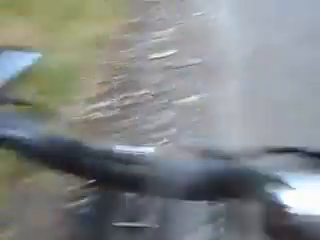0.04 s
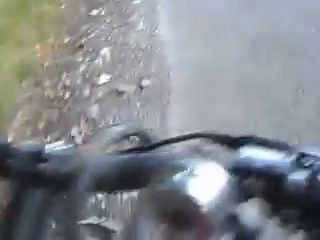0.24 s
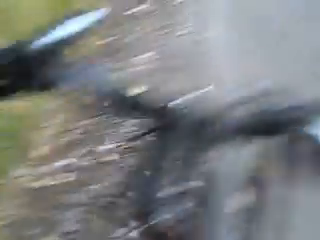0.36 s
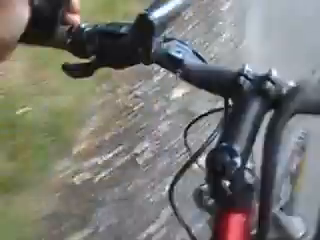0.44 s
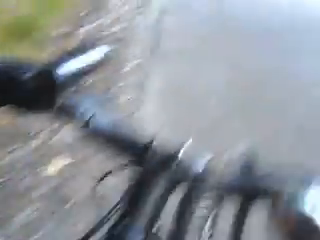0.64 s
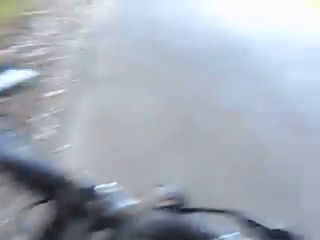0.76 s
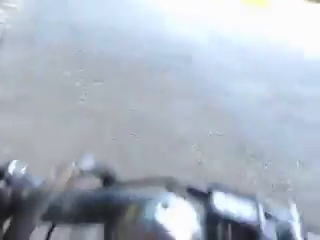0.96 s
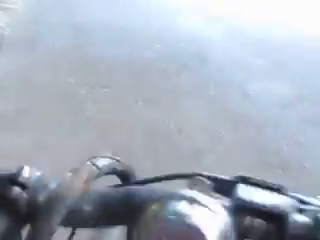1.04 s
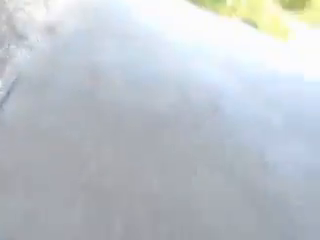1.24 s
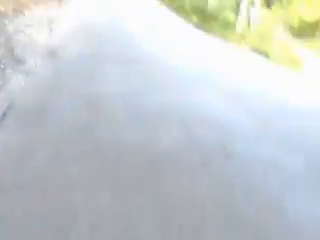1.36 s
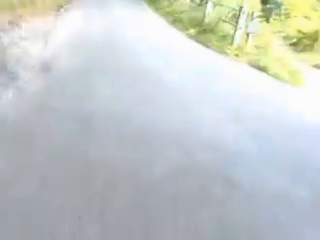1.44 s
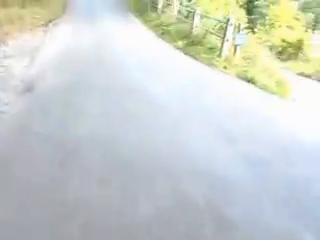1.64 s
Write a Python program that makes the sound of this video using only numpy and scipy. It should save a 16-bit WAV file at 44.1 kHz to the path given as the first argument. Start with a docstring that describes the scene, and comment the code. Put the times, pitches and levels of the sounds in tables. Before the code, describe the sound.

Loud metal clack of a bicycle changing gear, with clicks, rattling chain and faint hiss.

```python
"""A bicycle gives a loud metallic clack, like a gear change, as it rolls along a paved road.
Two sharp clicks lead up to it; then metal parts snap home, bounce and set the frame ringing.
The chain rattles over the sprockets and settles, with a few more clicks along the way.
We listen from a camera just above the handlebar. Its plastic mount knocks now and then
over a faint hiss of tyres and wind."""
import sys
import numpy as np
from scipy import signal
from scipy.fft import rfft, irfft
from scipy.io import wavfile
from scipy.ndimage import uniform_filter1d

SR = 44100
rng = np.random.default_rng(int(sys.argv[2]) if len(sys.argv) > 2 else 0)


def generate_wav(signal):
    """Clip the signal to [-1, 1] and save it as 16-bit WAV at the path in sys.argv[1]."""
    frames = np.transpose(np.atleast_2d(signal))
    scaled = np.clip(frames, -1, 1) * 32767
    pcm = np.round(scaled).astype(np.int16)
    wavfile.write(sys.argv[1], SR, pcm)


N = 74970  # 1.7 seconds

# The hits in the clack. Each row: start in seconds, level in dB, length in seconds, pitch and width in Hz.
CLACK_HITS = [(0.2994, -33, 0.005, 640, 600), (.3010, -25.5, 0.0078, 3650, 560),
              (0.3007, -32.5, 0.018, 7100, 2400), (.3028, -30.5, 0.013, 5800, 2200),
              (0.3031, -29.5, 0.0099, 1500, 800), (0.3114, -40, .016, 3400, 1200),
              (.3120, -38.5, 0.011, 7500, 1600), (.3140, -31.5, 0.014, 3300, 1900),
              (0.3173, -41, 0.03, 1750, 1600), (0.328, -48, 0.08, 1490, 790.7)]
# The metal's ringing tones. Each row: pitch in Hz, relative level in dB, fade time in seconds.
METAL_TONES = [(185, -14, .2), (290, -14, .13), (430, -17, .05), (682, -5, .075), (1252, -3, .06),
               (1780, 0, .1), (1852, -2, .08), (2013, -18, .4), (2448, -9, .1), (2849, -17, .4),
               (2983, -5, .11), (3048, -17, .3), (3160, -10, .06), (3370, -8, .1), (3512, -5, .055),
               (3588, -2, .075), (3760, -6, .04), (3977, -6, .06), (4119, -3, .065), (4970, -10, .05),
               (5503, -6, .06), (6300, -10, .04), (6918, -6, .055), (7757, -4, .045)]
# The tone of the shimmer after the clack. Each row: frequency in Hz, relative level in dB.
SHIMMER_SHAPE = [(200, -33), (400, -10), (1000, 2), (1800, 5.5), (2300, 2), (3000, 5.5), (4200, 0),
                 (6000, -11), (8300, -3.5), (10500, -21)]
# Sharp clicks. Each row: start in seconds, level in dB, pitch and width in Hz, tail in dB against the hit.
SHARP_CLICKS = [(0.0237, -46.5, 2620, 2200, 6), (0.1308, -39, 1560, 1500, -2.5),
                (0.1309, -41.5, 2680, 450, -10), (0.2258, -32, 3070, 3000, -5.5),
                (.5175, -67, 1866, 1480, -3), (.5972, -46, 2191, 1700, -1), (.6563, -43.5, 2250, 1500, -7),
                (0.678, -41, 2440, 1600, -4.5), (0.6842, -42.5, 2030, 1200, -5),
                (0.7587, -49.5, 2934, 2800, -3), (0.863, -52.5, 3070, 2400, -2),
                (1.045, -54.5, 2400, 2000, -11)]
# The tone of the running chain. Each row: frequency in Hz, relative level in dB.
CHAIN_SHAPE = [(200, -28), (500, -2.5), (1300, 2.5), (2900, 1), (4000, -4.5), (6000, -9.5), (9500, -13.5),
               (11000, -33)]
# How loud the running chain is. Each row: time in seconds, level in dB.
CHAIN_LOUDNESS = [(0, -50.5), (.12, -51.5), (.28, -47), (.44, -51), (.6, -46), (.71, -52.5), (.8, -62),
                  (.93, -55), (.98, -50.5), (1.03, -56), (1.08, -52.5), (1.17, -59), (1.33, -60),
                  (1.39, -54), (1.45, -69), (1.7, -61.5)]
# Chain rattles. Each row: start in seconds, level in dB, length in seconds, pitch and width in Hz.
CHAIN_RATTLES = [(0.0155, -44, 0.0036, 2620, 2180), (0.045, -43.5, 0.026, 2300, 2600),
                 (.101, -50.5, .011, 2300, 1990), (.159, -53, 0.0054, 1791, 1946),
                 (0.185, -55.5, 0.012, 5050, 4570), (0.242, -52, 0.0057, 3650, 4000),
                 (0.253, -45.5, 0.021, 2750, 2800), (0.366, -45, 0.02105, 4740, 4030),
                 (0.415, -51, 0.0076, 2000, 2500), (0.505, -43.5, 0.015, 1390, 1600),
                 (.508, -49, 0.0091, 5270, 1600), (0.537, -45.5, 0.018, 1820, 2000),
                 (0.54, -51.5, 0.017, 4252, 4560), (0.566, -52, 0.0048, 5630, 2600),
                 (0.568, -41, 0.017, 2280, 1890), (0.598, -46.5, 0.014, 2280, 1970),
                 (0.62, -54, 0.014, 2396, 1990), (0.657, -52, 0.0044, 2830, 2139),
                 (.683, -62, 0.01258, 2780, 3000), (0.892, -52.5, .009, 2470, 4000),
                 (0.95, -52.5, 0.017, 2941, 4500), (0.964, -56, 0.037, 8700, 1010),
                 (1.05, -52, 0.05, 2680, 700), (1.358, -48.5, .015, 2500, 900)]
# Knocks of the camera mount. Each row: start in seconds, level in dB, pitch and width in Hz,
# bright edge in dB against the knock.
MOUNT_KNOCKS = [(0.791, -54.5, 1310, 300, -4.5), (.925, -50.5, 977.5, 300, -24), (.956, -49, 1280, 90, -18),
                (1.3178, -52.5, 1150, 700, 0), (1.3201, -40.5, 1130, 526, -5.5),
                (1.3240, -47.5, 560, 250, -18), (1.449, -53, 1140, 500, -27), (1.457, -51.5, 970, 350, -25),
                (1.510, -51.5, 970, 240, -24), (1.547, -56, 1060, 600, -17), (1.585, -52, 1080, 700, -19)]
# The mount's ringing tones. Each row: pitch in Hz, relative level in dB, fade time in seconds.
MOUNT_TONES = [(490, -4, .05), (640, -5, .05), (1065, 0, .03), (1300, -4, .035), (1740, -8, .06)]
# The tone of tyres and wind. Each row: frequency in Hz, relative level in dB.
HISS_SHAPE = [(25, -11.5), (60, -15), (130, -10), (190, -7), (290, 0), (450, -2), (800, -0.5), (1250, -1.5),
              (2000, -1.5), (3000, -5.5), (4300, -8), (6000, -13.5), (8500, -17.5), (10000, -23),
              (11000, -28)]
# How the microphone softens the treble. Each row: frequency in Hz, gain in dB.
MIC_SHAPE = [(6500, -1.5), (8200, -6), (10000, -7.5), (10800, -15.5)]


def gear_clack():
    """Metal parts snap home and bounce; the frame rings and a fine shimmer dies away."""
    hits = 0
    for start, db, length, hz, width in CLACK_HITS:
        hits += at(burst_level(band(chatter(length), hz, width), db), start)
    shimmer = burst_level(shape_tone(chatter(fade_s=0.39), SHIMMER_SHAPE), db=-31)
    ring = burst_level(ringing(METAL_TONES), db=-23.5)
    return hits + at(ring + shimmer, start_s=0.3018)


def clicks():
    """Small parts are hit once: each gives a dry snap with a short tail and a little low body."""
    out = 0
    for start, db, hz, width, tail_db in SHARP_CLICKS:
        hit = hard_hit(fade_s=0.037, tail_db=tail_db, gap_s=0.0015)
        snap = burst_level(small_part(hit, hz, width), db)
        body = burst_level(band(chatter(fade_s=0.023), hz=990, width=800), db - 22)
        out += at(snap + body, start)
    return out


def chain():
    """Links tick densely over the sprockets and rattle in short flurries that swell and fade."""
    t = np.arange(N) / SR
    ticks = rng.standard_normal(N) * gain(3 * wobble(rate_hz=700))
    loudness_db = np.interp(t, *np.array(CHAIN_LOUDNESS).T)
    out = steady_level(shape_tone(ticks, CHAIN_SHAPE), 0) * gain(loudness_db)
    for start, db, length, hz, width in CHAIN_RATTLES:
        swell = t / length * np.exp(-np.pi * (t / length) ** 2) + 1e-12
        flurry = rng.standard_normal(N) * swell * gain(2.5 * wobble(rate_hz=916))
        out += at(burst_level(small_part(flurry, hz, width), db), start)
    return out


def mount_knocks():
    """The plastic mount knocks hollowly with a brief bright edge; each knock favours different tones."""
    out = 0
    for start, db, hz, width, edge_db in MOUNT_KNOCKS:
        hit = hard_hit(fade_s=0.046, tail_db=-4, gap_s=0.00091)
        ring = burst_level(ringing(MOUNT_TONES), db=-8)
        knock = burst_level(small_part(hit + ring, hz, width), db)
        edge = band(chatter(fade_s=0.01), hz=4300, width=2500)
        out += at(knock + burst_level(edge, db + edge_db), start)
    return out


def tyres_and_wind():
    """Rolling tyres and passing air make a soft, steady hiss."""
    return steady_level(shape_tone(rng.standard_normal(N), HISS_SHAPE), db=-55)


def hard_hit(fade_s, tail_db, gap_s):
    """One hard contact, then a tail of chatter after a tiny gap."""
    hit = burst_level(signal.unit_impulse(N), 0)
    return hit + at(burst_level(chatter(fade_s), tail_db), gap_s)


def chatter(fade_s):
    """Fading noise stands for a dying flurry of tiny contacts."""
    return rng.standard_normal(N) * fade(fade_s)


def ringing(tones):
    """A struck object rings with several pure tones, each fading at its own speed."""
    t = np.arange(N) / SR
    return sum(gain(db) * fade(fade_s) * np.sin(2 * np.pi * (hz * t + rng.random()))
               for hz, db, fade_s in tones)


def small_part(x, hz, width):
    """A small, damped part sounds around one pitch, and its treble falls away quickly."""
    bright = band(x, hz, width)
    top_hz = min(hz + 0.7 * width, SR / 3)
    dull = signal.sosfiltfilt(signal.butter(3, top_hz, fs=SR, output="sos"), bright, padtype=None)
    leak = gain(-10)  # some treble still gets through
    return (1 - leak) * dull + leak * bright


def cut_bass(x, below_hz):
    """Small parts give off no bass, so filter it out."""
    high_pass = signal.butter(2, below_hz, "high", fs=SR, output="sos")
    return signal.sosfilt(high_pass, signal.sosfilt(high_pass, x))


def band(x, hz, width):
    """Keep a range about `width` Hz wide around one pitch; filtering twice makes its sides steeper."""
    g = np.tan(np.pi * min(hz / SR, 0.45))  # tuning
    k = 1.55 * width / hz  # damping
    b = [g * k, 0, -g * k]
    a = [1 + g * k + g * g, 2 * (g * g - 1), 1 - g * k + g * g]
    return signal.lfilter(b, a, signal.lfilter(b, a, x))


def shape_tone(x, points):
    """Turn frequencies up or down along a curve of (Hz, dB) points."""
    hz, db = np.array(points, float).T
    freqs = np.maximum(np.arange(N + 1) * SR / (2 * N), 1)
    curve = gain(np.interp(np.log(freqs), np.log(hz), db))
    # Fold the filter forward in time, so nothing sounds before its hit.
    cepstrum = irfft(np.log(curve))
    cepstrum[1:N] *= 2
    cepstrum[N + 1:] = 0
    return irfft(rfft(x, 2 * N) * np.exp(rfft(cepstrum)))[:N]


def wobble(rate_hz):
    """A smooth random wiggle, typically about 1 in size."""
    hold = int(SR / rate_hz)
    steps = np.repeat(rng.standard_normal(N // hold + 1), hold)
    smooth = uniform_filter1d(uniform_filter1d(steps, hold), hold)[:N]
    return smooth / smooth.std()


def fade(fade_s):
    """A curve that drops by 60 dB over the fade time."""
    return gain(-60 * np.arange(N) / SR / fade_s) + 1e-12


def gain(db):
    """Turn decibels into a number to multiply by."""
    return 10 ** (np.asarray(db) / 20)


def steady_level(x, db):
    """Set a steady sound's average (rms) level."""
    return x * gain(db) / np.sqrt(np.mean(x ** 2))


def burst_level(x, db):
    """Give a short sound the energy of 0.01 seconds at this level."""
    return x * gain(db) / np.sqrt(np.sum(x ** 2) / (0.01 * SR))


def at(x, start_s):
    """Delay a sound until its start time."""
    return np.concatenate([np.zeros(int(start_s * SR)), x])[:N]


def scene():
    """The whole bicycle, mixed into one channel."""
    impacts = cut_bass(gear_clack() + clicks() + mount_knocks(), below_hz=264)
    return (impacts + chain() + tyres_and_wind())[None]


def record(dry):
    """The microphone softens the treble, and the camera cuts off everything above 10600 Hz."""
    low_pass = signal.ellip(10, 0.2, 80, 10600, fs=SR, output="sos")
    return signal.sosfilt(low_pass, shape_tone(dry[0], MIC_SHAPE))[None]


dry = scene()
out = record(dry)
generate_wav(out)
```